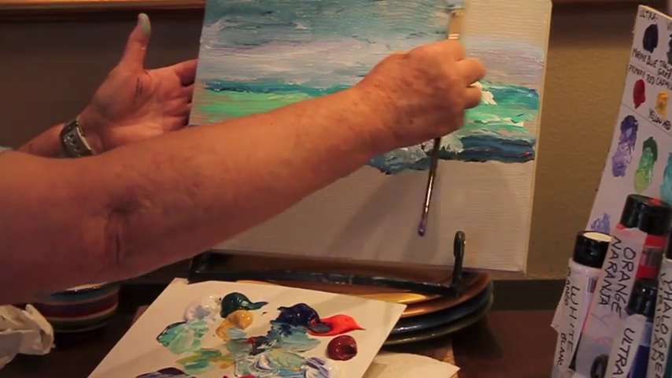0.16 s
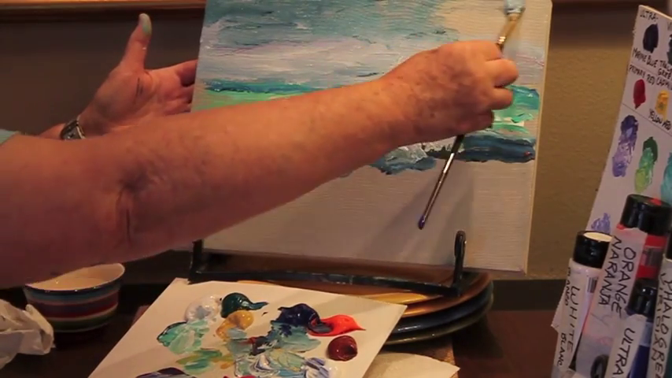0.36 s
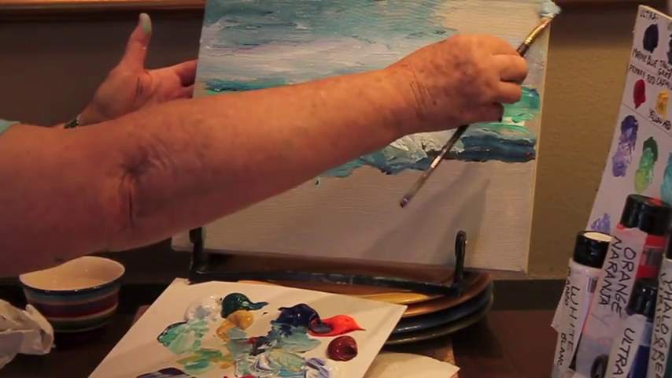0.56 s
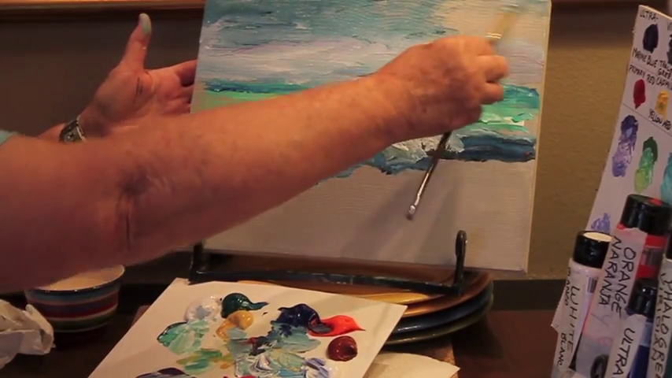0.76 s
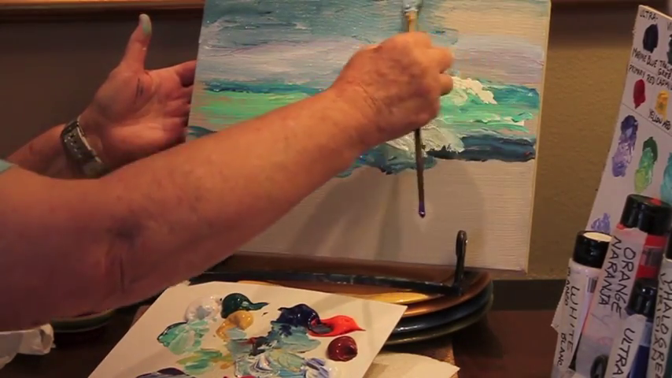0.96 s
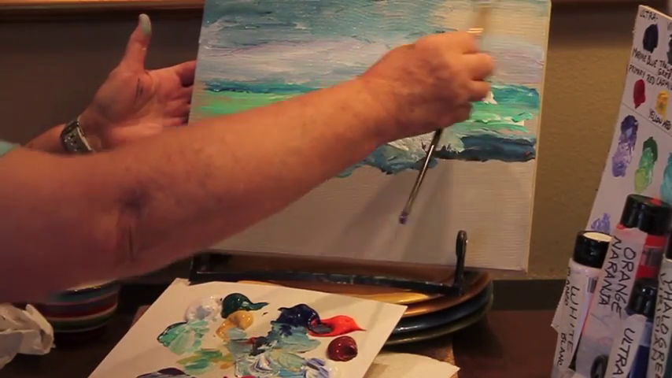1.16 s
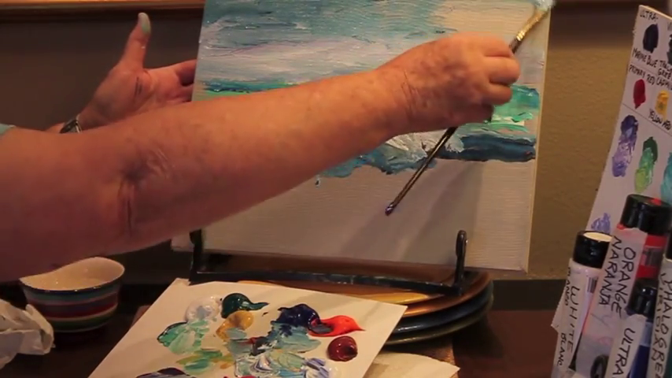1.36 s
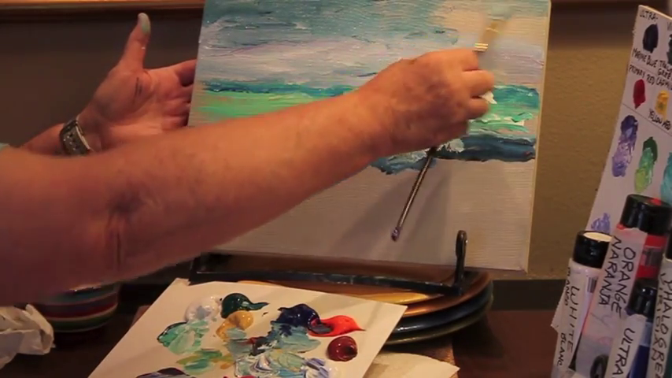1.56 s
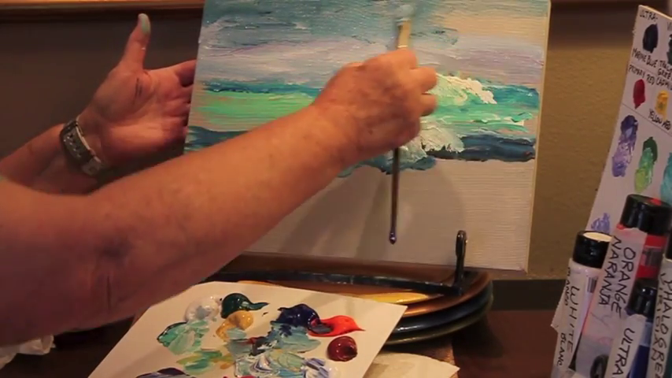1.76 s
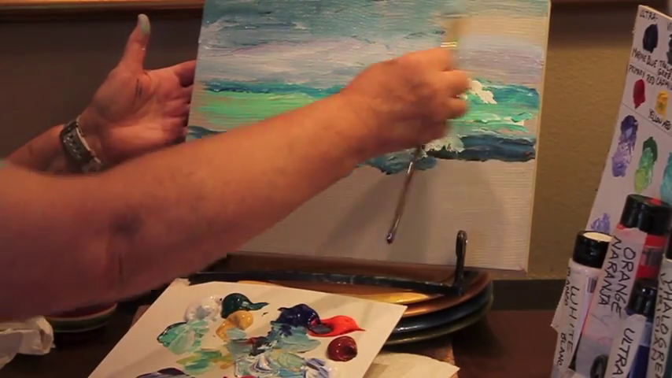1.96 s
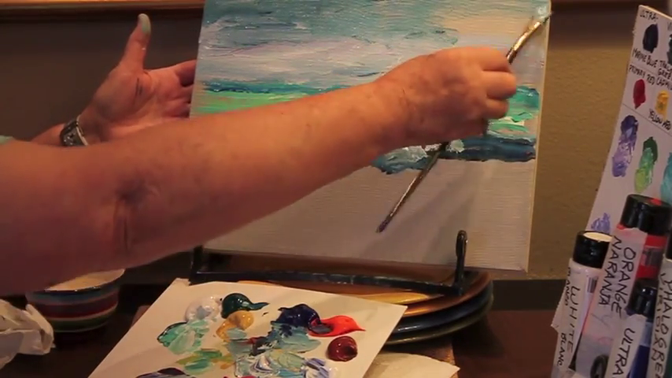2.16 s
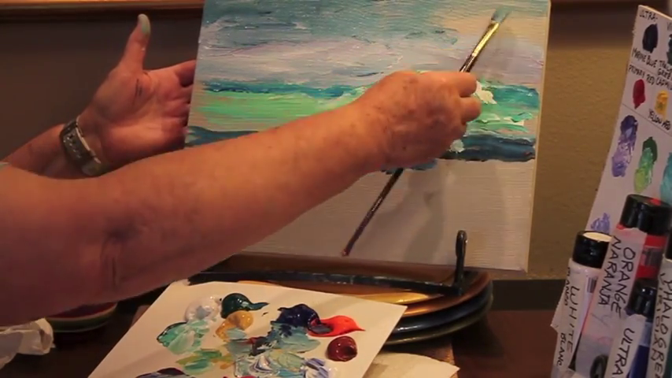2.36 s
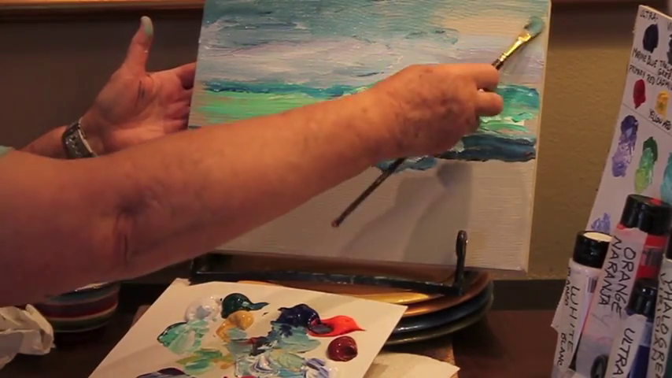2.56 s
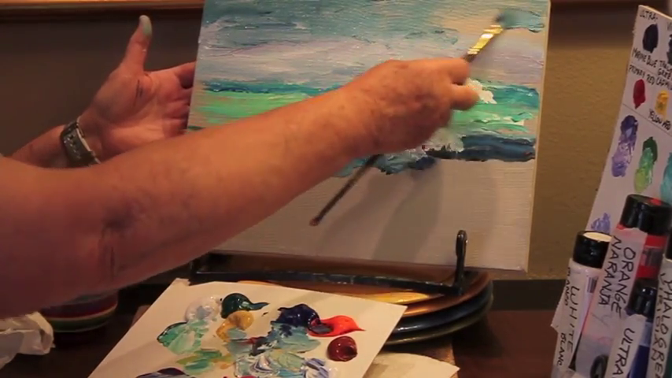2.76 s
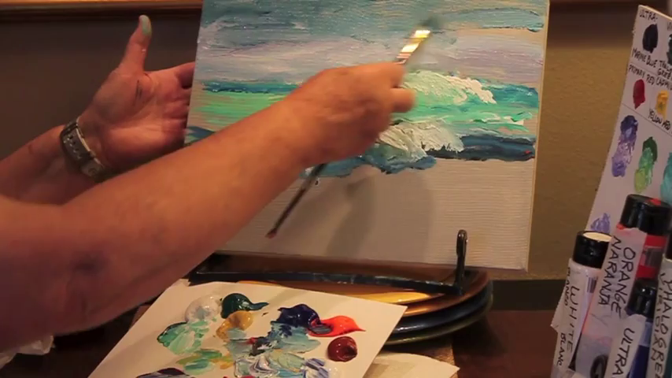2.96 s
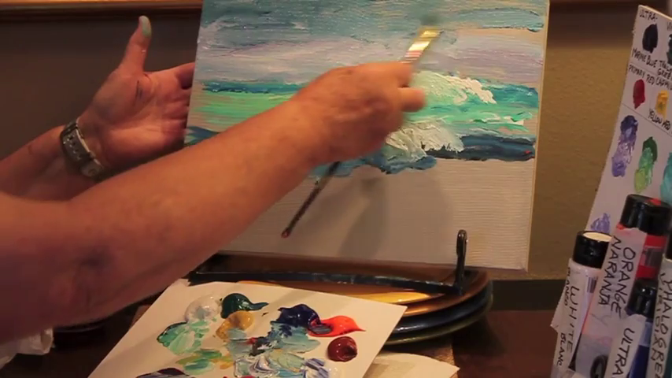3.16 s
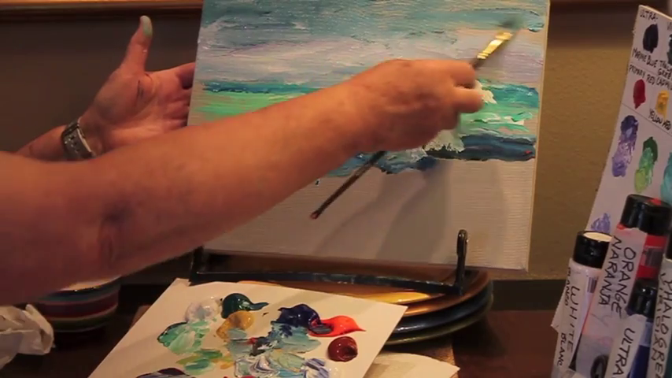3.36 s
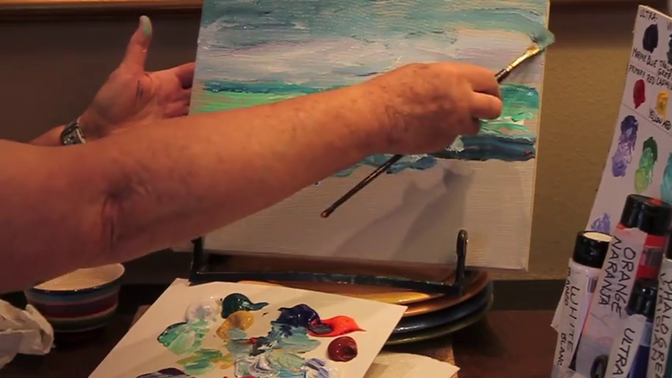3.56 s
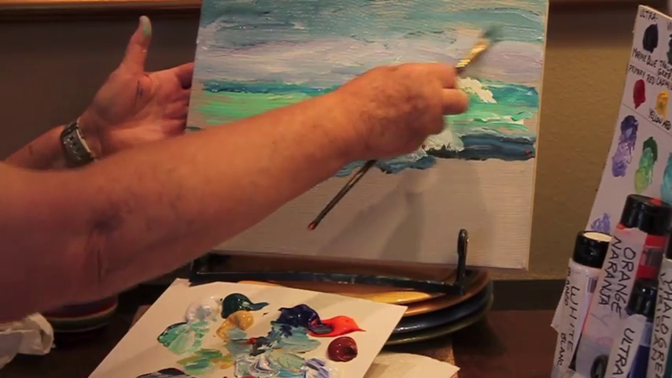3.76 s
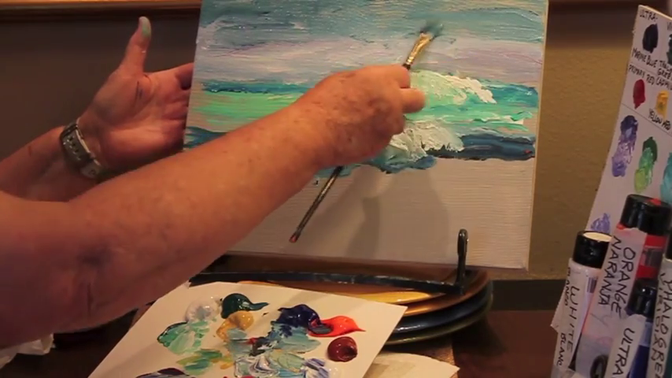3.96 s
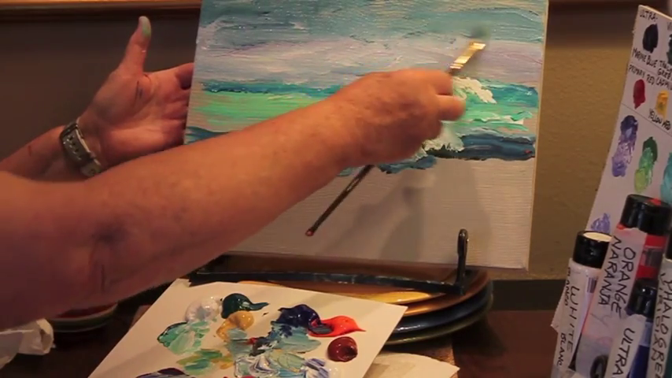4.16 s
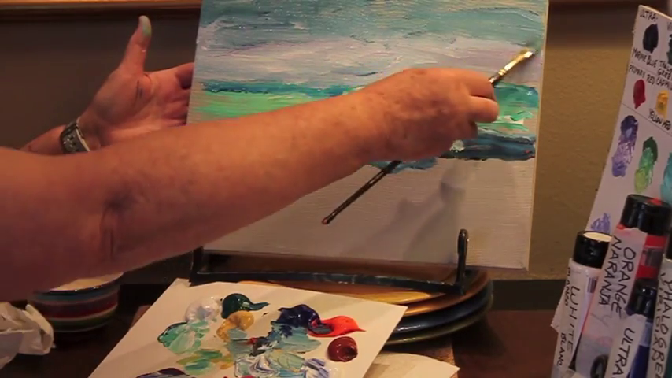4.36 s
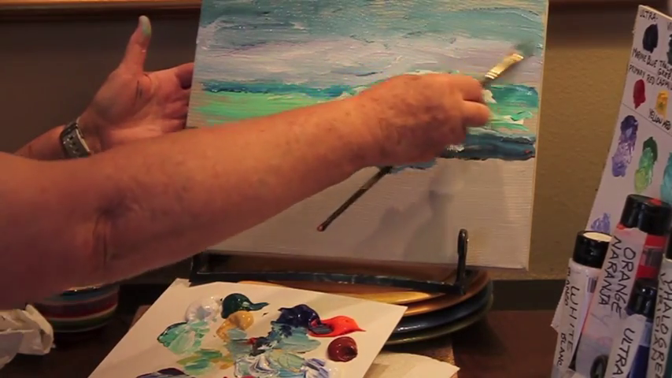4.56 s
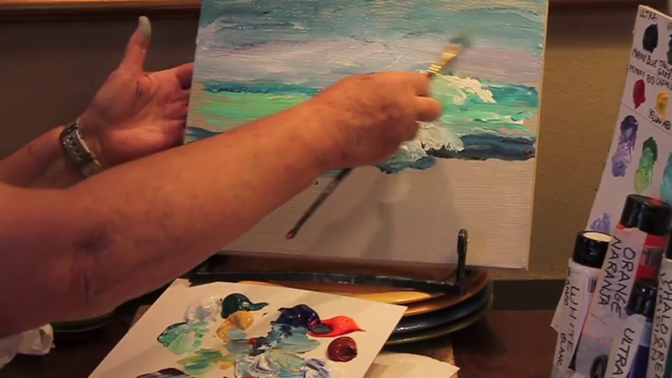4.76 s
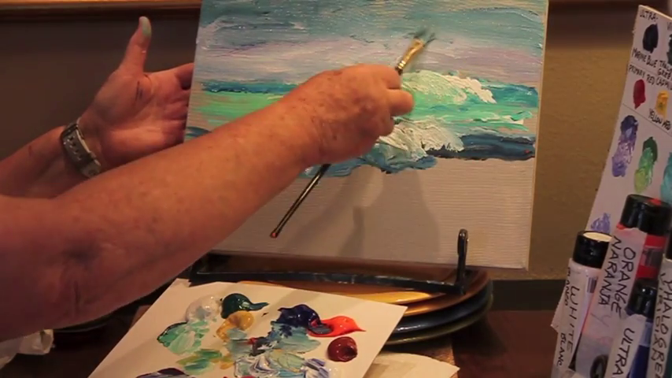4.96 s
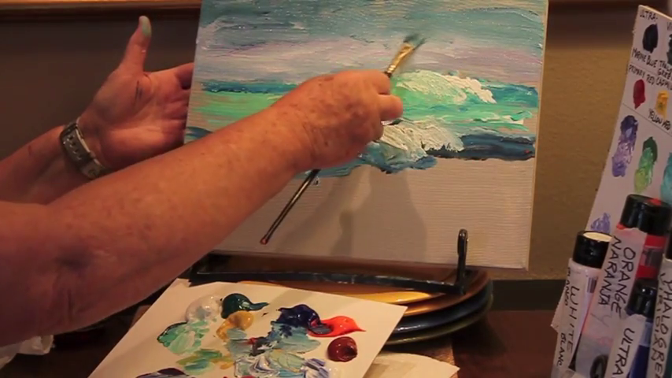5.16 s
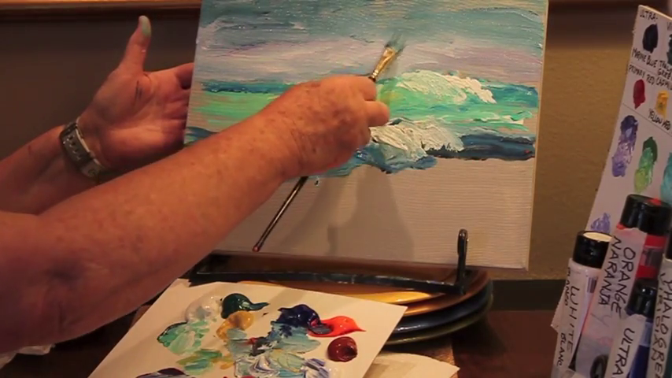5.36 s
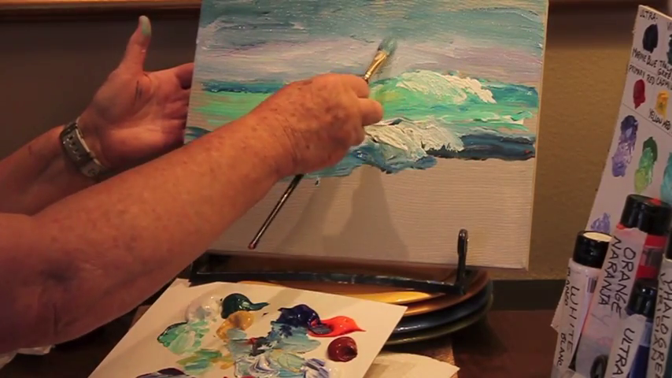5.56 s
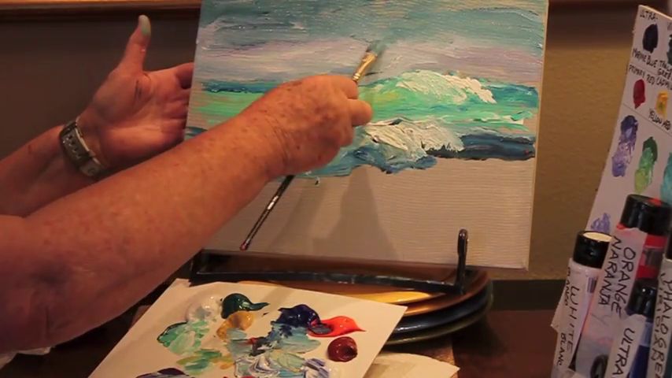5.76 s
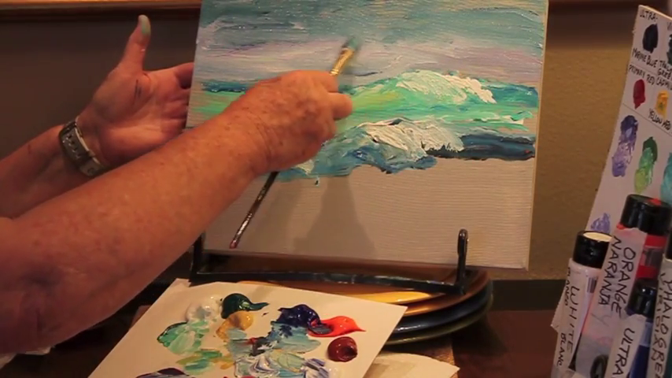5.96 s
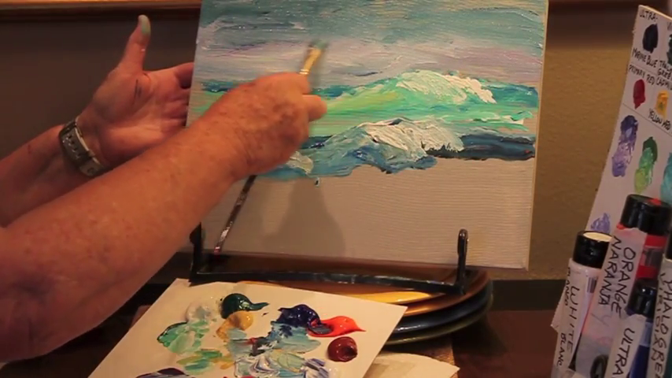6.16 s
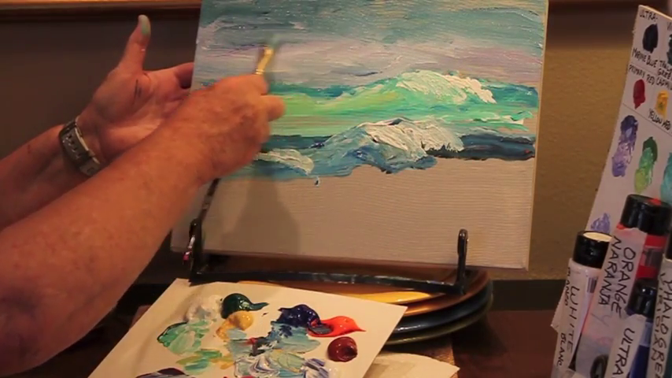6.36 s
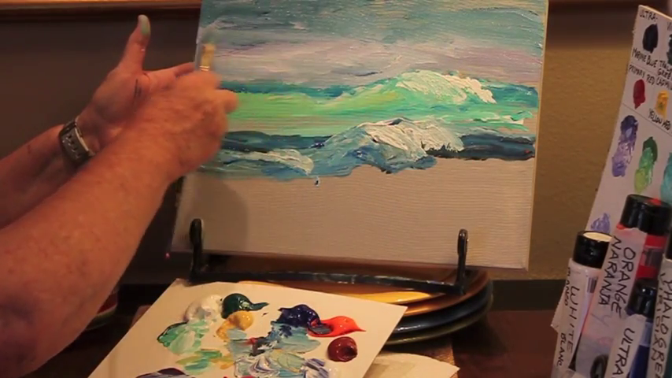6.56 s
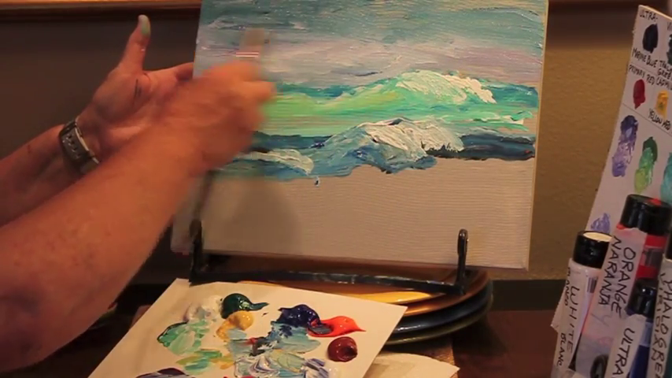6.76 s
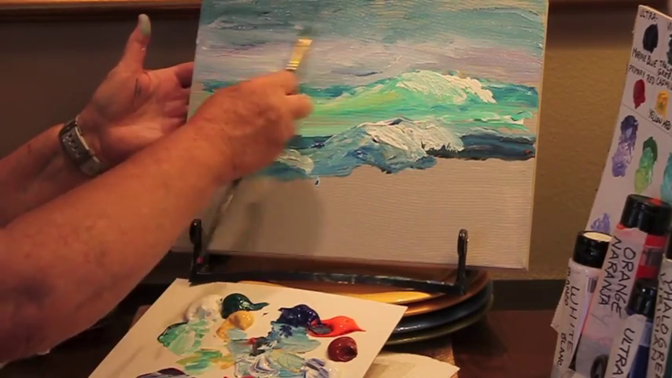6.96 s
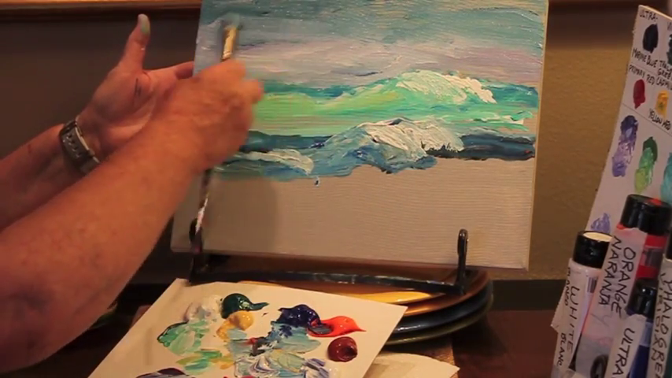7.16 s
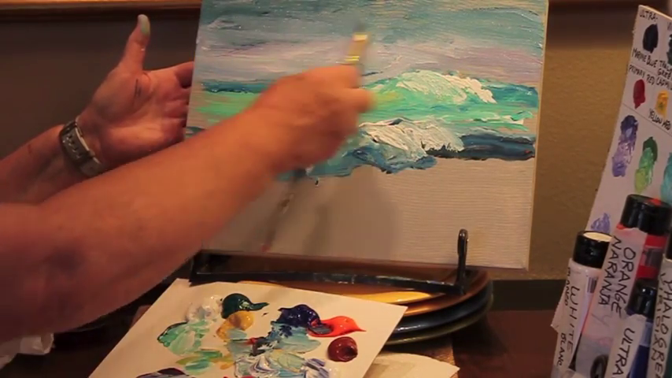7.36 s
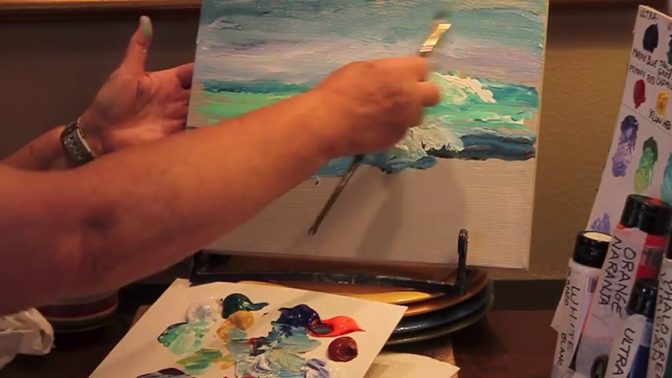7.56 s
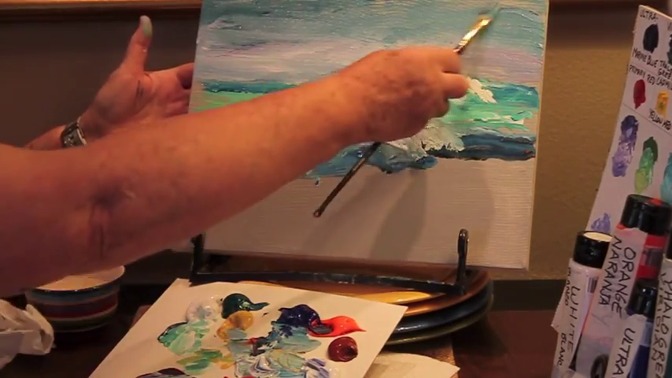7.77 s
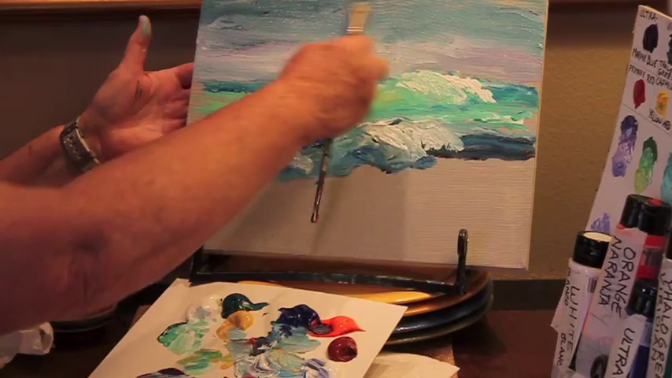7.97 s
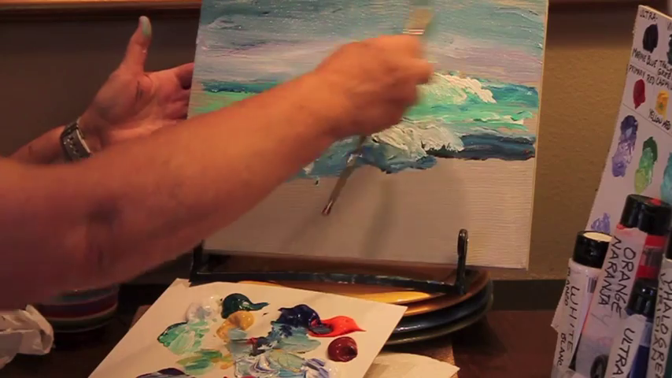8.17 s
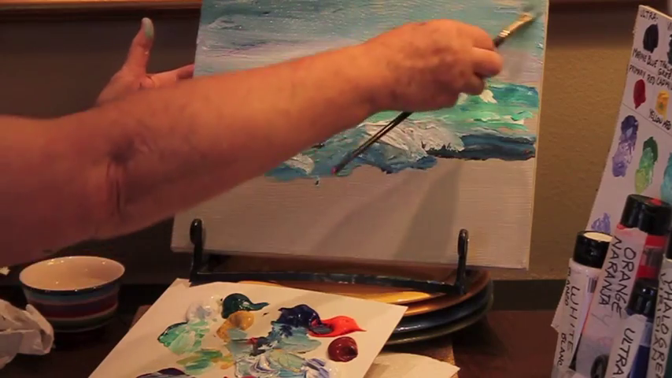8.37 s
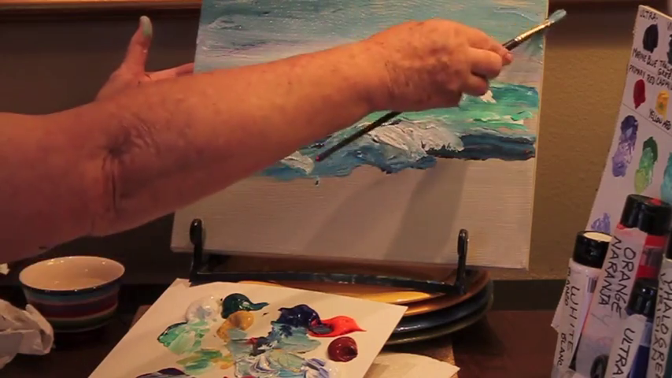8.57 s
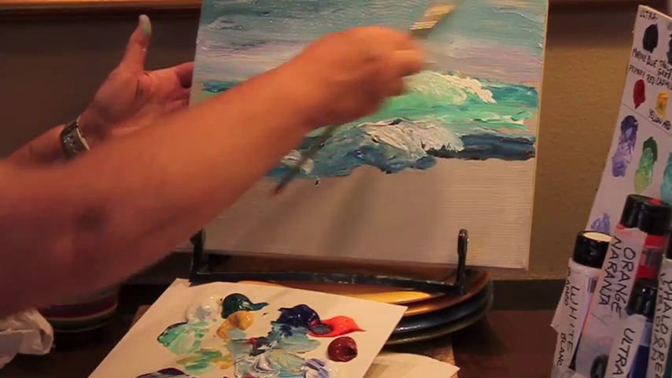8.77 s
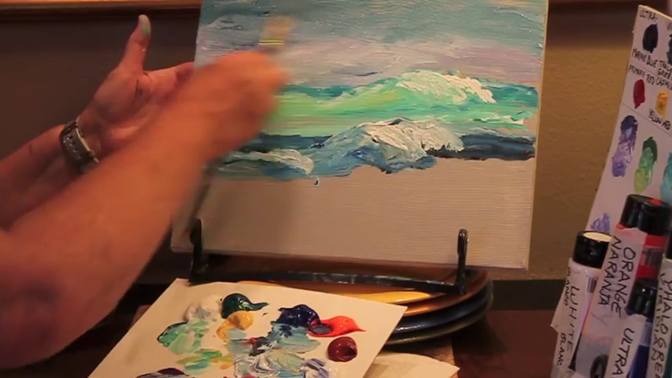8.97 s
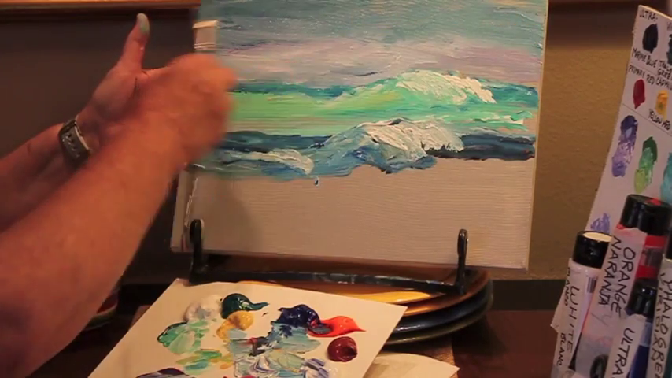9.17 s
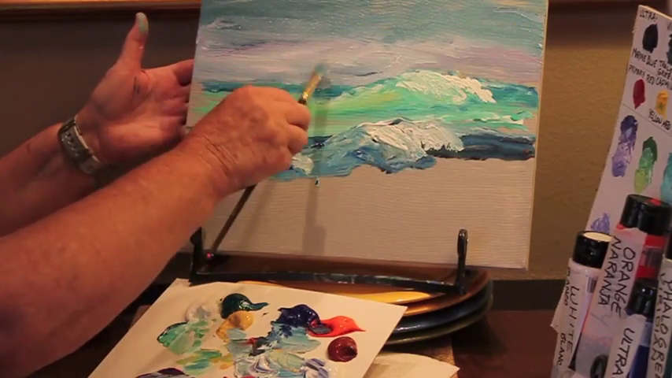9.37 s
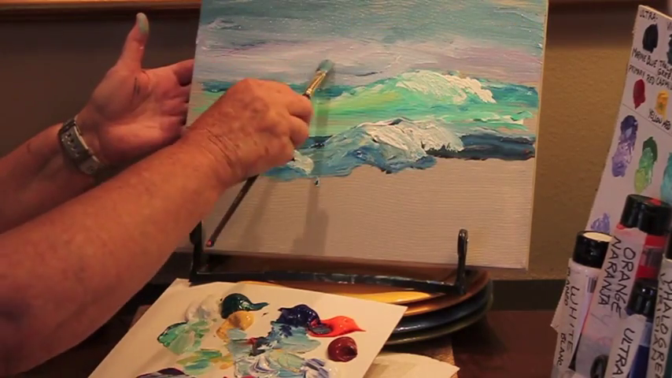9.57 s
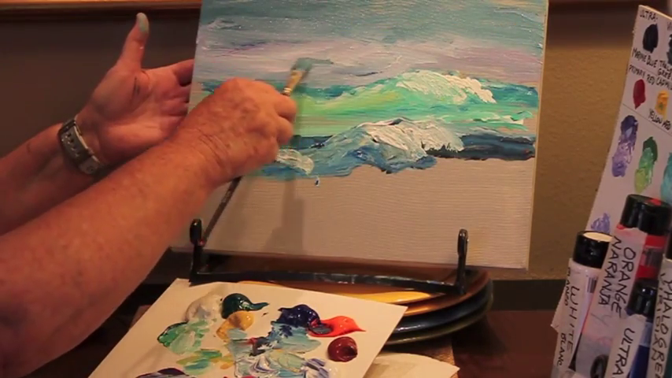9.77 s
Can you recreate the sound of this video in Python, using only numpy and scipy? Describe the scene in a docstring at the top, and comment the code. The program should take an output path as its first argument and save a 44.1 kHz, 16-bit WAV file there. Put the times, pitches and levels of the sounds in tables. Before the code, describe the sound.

A bristle brush scrubs thick paint over a canvas board in quick, dry, hissing strokes. Wet paint gives tiny crackles and snaps, and the board creaks briefly on its easel. The strokes start firm, thin to faint touches past the middle, then grow stronger again near the end. It is heard from nearby in a small room, with a steady, gently pulsing motor hum and soft rushing air.

```python
"""Scrubbing paint onto a canvas

A bristle brush scrubs thick paint back and forth over a canvas board on an easel, in a small room.
Bristles catch and let go on the weave and set the board rasping; wet paint crackles and snaps,
and the board creaks on its stand. Two motors hum and beat against each other over a soft rush of air."""
import sys
import numpy as np
from scipy import signal
from scipy.fft import rfft, irfft, next_fast_len
from scipy.io import wavfile

SR = 44100
rng = np.random.default_rng(int(sys.argv[2]) if len(sys.argv) > 2 else 0)


def generate_wav(signal):
    """Clip the signal to [-1, 1] and save it as 16-bit WAV at the path in sys.argv[1]."""
    frames = np.transpose(np.atleast_2d(signal))
    scaled = np.clip(frames, -1, 1) * 32767
    pcm = np.round(scaled).astype(np.int16)
    wavfile.write(sys.argv[1], SR, pcm)


N = 432621
TIME = np.arange(N) / SR


def from_db(db):
    """Turn decibels into a number to multiply a sound by."""
    return 10 ** (np.asarray(db) / 20)


def unit_level(x):
    """Scale a sound so that its average (rms) level is one."""
    return x / np.sqrt(np.mean(x ** 2) + 1e-20)


def band(x, low_hz, high_hz, order=2):
    """Keep what lies between two frequencies; a higher order cuts more sharply."""
    sections = signal.butter(order, [low_hz, min(high_hz, .45 * SR)], "band", fs=SR, output="sos")
    return signal.sosfilt(sections, x + 1e-18)


def coloured(x, spectrum):
    """Turn frequencies up or down along a curve of (frequency [Hz], level [dB]) points."""
    size = next_fast_len(N)
    hz, db = np.transpose(spectrum)
    bin_hz = np.maximum(np.arange(size // 2 + 1) * SR / size, 1)
    gain = from_db(np.interp(np.log(bin_hz), np.log(hz), db))
    return irfft(rfft(x, size) * gain, size)[:N]


def drift(rate_hz):
    """A smooth random wobble, mostly between -1 and 1."""
    step = 40  # samples between random values
    r = np.exp(-2 * np.pi * step * rate_hz / SR)
    noise = rng.standard_normal(N // step + 2002)
    slow = signal.lfilter([1], [1, -2 * r, r * r], noise)[2000:]  # let the filter settle first
    return np.interp(np.arange(N) / step, np.arange(len(slow)), unit_level(slow))


def resonance(x, hz, width_hz):
    """Let through only the sound close to one pitch."""
    r = np.exp(-np.pi * width_hz / SR)
    poles = [1, -2 * r * np.cos(2 * np.pi * hz / SR), r * r]
    return signal.lfilter(np.array([1, 0, -1]) * (1 - r * r) / 2, poles, x)


def moving_resonance(x, centre_hz, width_hz, block=128):
    """A resonance whose pitch glides in tiny steps."""
    r = np.exp(-np.pi * width_hz / SR)
    out, state = np.zeros(N), np.zeros(2)
    for i in range(0, N, block):
        poles = [1, -2 * r * np.cos(2 * np.pi * centre_hz[i] / SR), r * r]
        out[i:i + block], state = signal.lfilter([1, 0, -1], poles, x[i:i + block], zi=state)
    return unit_level(out)


def ring(x, hz, fade_s):
    """Each click starts a pure tone that falls by 60 dB in fade_s."""
    r = from_db(-60 / (fade_s * SR))
    angle = 2 * np.pi * hz / SR
    return signal.lfilter([0, np.sin(angle)], [1, -2 * r * np.cos(angle), r * r], x + 1e-18)


def clicks(events):
    """One click for each (time [s], level [dB]) row."""
    out = np.zeros(N)
    for time_s, db in events:
        out[min(round(time_s * SR), N - 1)] += from_db(db)
    return out


def smear(x, fade_s):
    """Spread every moment of a sound into a noisy tail that falls by 60 dB in fade_s."""
    t = TIME[:SR // 2]
    tail = rng.standard_normal(len(t)) * from_db(-60 * t / fade_s)
    return signal.fftconvolve(x, tail / np.linalg.norm(tail))[:N]


# tone colour of the moving air: (frequency [Hz], relative level [dB])
AIR_COLOUR = [(20, -21), (42, -23), (52, -9), (70, -4.5), (120, -2), (190, -2), (260, 3.5), (340, -4),
              (440, 2), (600, -5.5), (900, -6), (1700, -15), (3500, -18), (9000, -23.5), (16000, -27.5)]


def air(level_db=-52):
    """Moving air makes a smooth, low rush."""
    return from_db(level_db) * unit_level(coloured(rng.standard_normal(N), AIR_COLOUR))


# tones of the motors and the mains power: (pitch [Hz])
HUM_PITCHES = [58.4, 76.5, 102, 120, 167.1, 175.2, 178.4, 203.9, 233.58, 235.41, 280.4, 287.8, 292, 407.8,
               440.7, 451.4, 467.2, 759.1]
# how strong each of those tones is: (level [dB])
HUM_LEVELS = [-77, -81, -76, -68.5, -72.5, -82, -66, -70, -59.5, -55.5, -72.5, -69.5, -55, -65.5, -67.5,
              -78, -61, -70.5]


def motors(waver_db=1.06):
    """Motors hum in gently wavering tones; the closest pair beats about twice a second."""
    hum = np.zeros(N)
    for hz, db in zip(HUM_PITCHES, HUM_LEVELS):
        tone = np.sqrt(2) * np.sin(2 * np.pi * hz * TIME)
        hum += from_db(db + waver_db * drift(rate_hz=1.57)) * tone
    return hum


def room(x, echo_db=-5.0):
    """Near walls send back a quick, slightly dull blur of echoes."""
    return from_db(echo_db) * band(smear(x, fade_s=0.24), 120, 6000, order=1)


# the notes the easel rings with: (pitch [Hz], relative level [dB], fade time [s])
EASEL_NOTES = [(353, -13, 0.14), (787, -14, .1), (1047, -9.5, 0.26), (1335, -12, 0.084), (1834, -20, 0.23),
               (2174, -9.5, 0.23)]


def easel(jolts):
    """Each jolt sets the easel ringing briefly."""
    return sum(from_db(db) * ring(jolts, hz, fade_s) for hz, db, fade_s in EASEL_NOTES)


# moments when the board slips on the easel: (time [s], level [dB])
BOARD_SLIPS = [(0.0553, -38), (0.244, -40), (0.3623, -42), (2.067, -37.5), (3.4315, -46), (3.878, -46),
               (5.356, -55)]
# the tones in one creak: (multiple of the creak's pitch, relative level [dB])
CREAK_TONES = [(1, -7.5), (2, -1.5), (3, -6.5), (4, -31)]


def creaks(start_hz=465, end_hz=560, length_s=0.032, flutter_db=3.0):
    """The board jolts the easel, then sticks and slips faster and faster until it settles."""
    out = easel(clicks(BOARD_SLIPS))
    pitch_wobble = 1 + 0.018 * drift(rate_hz=130)
    grip = from_db(flutter_db * drift(rate_hz=340))
    for time_s, db in BOARD_SLIPS:
        span = slice(round(time_s * SR), round((time_s + length_s) * SR))
        progress = np.sqrt(np.clip((TIME[span] - time_s) / length_s, 0, 1))  # 0 to 1, quick at first
        pitch_hz = (start_hz + (end_hz - start_hz) * progress) * pitch_wobble[span]
        phase = 2 * np.pi * np.cumsum(pitch_hz) / SR
        creak = sum(from_db(tone_db) * np.sin(multiple * phase) for multiple, tone_db in CREAK_TONES)
        out[span] += from_db(db) * np.sin(np.pi * progress) * grip[span] * creak
    return out


# sticky snaps of paint and bristle tips: (time [s], relative level [dB])
PAINT_SNAPS = [(0.0283, -26), (0.051, -18), (0.1084, -13), (0.1365, -13), (0.1514, -28), (0.185, -12),
               (0.2022, -8.5), (1.1854, -11), (1.2214, -33), (1.5045, -29), (2.0337, -6), (4.2083, -28),
               (6.1789, -33), (6.3904, -37), (6.5271, -39), (6.9955, -21.5), (8.114, -24), (9.7737, -35)]


def snaps(boost_db=1.5, spray_db=1.5):
    """Sticky paint snaps with a sharp tick, then a very short spray of bristles."""
    ticks = clicks(PAINT_SNAPS)
    spray = from_db(spray_db) * smear(ticks, fade_s=0.02)
    return from_db(boost_db) * band(ticks + spray, 7500, 15000)


def flicks(per_s, spread_db):
    """Tiny clicks of things letting go at random moments, most softly and a few hard."""
    sizes = from_db(spread_db * np.minimum(rng.exponential(1, N), 5))
    signs = rng.choice([-1, 1], N)
    happens = rng.random(N) < per_s / SR
    return unit_level(sizes * signs * happens)


def canvas(x, ring_db=-10.0, patch_count=9):
    """Each patch of canvas rings in its own way; the brush travels from one to the next."""
    nearness = np.array([drift(rate_hz=2.74) for _ in range(patch_count)])
    patches = np.array([smear(x, fade_s=0.041) for _ in range(patch_count)])
    ringing = np.sum(nearness * patches, axis=0) / np.linalg.norm(nearness, axis=0)
    return x + from_db(ring_db) * ringing


# the notes the board rings with: (pitch [Hz], width [Hz], relative level [dB])
BOARD_NOTES = [(1775, 11, 4), (2210, 85, -7), (2510, 57, 2.5), (2650, 63, -2.5), (2900, 18, 1.5),
               (2955, 52, -3), (3203, 48, 2.5), (3484, 57, 1), (4050, 34, -6), (4385, 84, -9),
               (4500, 29, 2), (5830, 50, -1), (7370, 150, 8)]


def board(slips):
    """Slipping bristles shake the board, which adds its own ringing."""
    return slips + sum(from_db(db) * resonance(slips, hz, width_hz) for hz, width_hz, db in BOARD_NOTES)


# each push or pull of the brush; hiss, drag and tuft are set against the rasp, before brush() mixes them:
# (time [s], rise time [s], time until lift [s], rasp level [dB], swell until lift [dB],
#  hiss level [dB], low drag level [dB], hollow tuft level [dB], tuft starting pitch [Hz])
BRUSH_STROKES = [ (0.0, 0.067, 0.057, -35.5, -0.5, 1.5, -9.5, -25, 2700),
                 (0.075, 0.039, 0.077, -36.5, -0.5, 1, -12.5, -13, 3200),
                 (0.19, .025, 0.052, -38, 0, 5, -16, -27, 3200),
                 (0.285, 0.063, 0.099, -41.5, -2.5, 4, -8.5, -20, 3200),
                 (0.41, 0.062, 0.078, -42, 2.5, 1.5, -13, 6.5, 2700),
                 (0.55, 0.036, 0.046, -51, -2.5, -4, -5, 2, 2900),
                 (0.62, .03, .05, -62, -1, -4, -4, 2, 2900),
                 (0.72, 0.061, 0.11, -34.5, -0.5, -0.5, -12, -3, 2700),
                 (0.825, 0.055, 0.13, -37.5, 2.5, -5, -13.5, -4, 3000),
                 (1.048, 0.064, 0.17, -39.5, -1, 1.5, -11, -7.5, 3070),
                 (1.22, .035, 0.24, -51, -9.5, 1.5, -6, -1, 3000),
                 (1.488, 0.025, 0.19, -38.5, 3.5, -2, -10, 5, 2680),
                 (1.69, 0.037, 0.11, -41, -2, -2.5, -8, -5, 3020),
                 (1.894, .065, 0.18, -36, 0.5, -1, -10, 1, 2860),
                 (2.09, 0.023, 0.044, -46.5, 1.5, -3.5, -2.5, 5, 2820),
                 (2.745, .16, 0.21, -46.5, -1, -2, -3, 5, 3150),
                 (2.96, .05, 0.071, -45.5, -2, 1.5, -3, -3, 3050),
                 (3.122, 0.089, 0.13, -47.5, -0.5, 4, -5, -2, 3050),
                 (3.265, 0.034, 0.21, -47.5, -9.5, -2.5, -4, 2, 3120),
                 (3.5, .04, .06, -63.5, 0, 1, -11, -10, 3000),
                 (3.645, 0.087, 0.15, -43, -0.5, -2, -6.5, -8, 2900),
                 (3.805, 0.061, .115, -43, -1, 0.5, -3, -4, 2900),
                 (4.035, 0.043, 0.2, -53.5, 6, 3.5, -3, 0, 3500),
                 (4.255, 0.047, 0.098, -54.5, 0.5, -1, -5.5, 0, 3300),
                 (4.415, .03, .045, -65, 2, 1, -9, 4, 3900),
                 (4.552, 0.06, 0.054, -46, 1.5, 0, -4.5, -6, 3200),
                 (4.645, 0.05, 0.22, -53, 0, 0, 0.5, -4, 3160),
                 (4.935, .03, 0.036, -61.5, -2, 5, -4, -10, 3000),
                 (5.015, 0.029, 0.036, -63.5, -8, 7.5, 2, -10, 3000),
                 (5.1, 0.028, .06, -64, -2, 3, -2, -10, 3000),
                 (5.205, .05, 0.097, -61, -5, 4.5, -1, -10, 3000),
                 (6.1, .1, 0.21, -69.5, -3, 9, -2, -8, 3000), (6.335, .05, 0.21, -75, 4, 13, 2, -10, 3000),
                 (6.515, .06, 0.092, -57, -1, 4.5, -3, -1.5, 3000),
                 (6.885, .02, .03, -78, 0, 8, -4, -10, 2800),
                 (6.955, 0.066, 0.11, -53, 0, 2.5, -4, -12, 2800),
                 (7.125, .03, 0.035, -68, -5, 6, -3, -8, 2800),
                 (7.305, 0.046, .2, -54.5, 7.5, 0, -7, 4, 2600),
                 (7.495, .06, .15, -51, 8, -4.5, -6, 4, 3070),
                 (7.65, .03, 0.068, -49, -2.5, -4.5, -6, -6, 3100),
                 (7.808, 0.097, 0.14, -40.5, 3.5, -1, -10.5, 1, 2920),
                 (7.96, .02, 0.048, -42.5, -2, 1.5, -7.5, 1, 2880),
                 (8.098, 0.039, .18, -47, 3.5, 1, -7.5, 1, 2870),
                 (8.3, 0.079, .14, -52, 0.5, 0, -9, 1, 2830),
                 (8.604, 0.043, 0.05, -50.5, -2, -2, -9, 0, 3200),
                 (8.77, .04, 0.14, -58, 3.5, 3, -9, 5, 3000),
                 (8.882, 0.057, 0.075, -39.5, -2, -3.5, -15, 8, 2630),
                 (8.958, .04, 0.12, -41.5, -7, -2, -4, 1, 3120),
                 (9.715, .06, .09, -65.5, -5, 6, 2, -10, 3000)]


def strokes(hiss_sag_db_per_s=4, tuft_rise_hz_per_s=1100, tuft_fade_db_per_s=21):
    """Strokes rise, hold and die away: gives rasp, hiss and drag strength, and tuft pitch and level."""
    power, tuft_db = np.zeros((3, N)), np.zeros(N)
    tuft_hz = np.full(N, float(BRUSH_STROKES[0][-1]))
    # rasp, hiss, drag: once the brush lifts, the hiss dies first and the drag last
    release_db_per_s = np.array([[208], [277], [180]])
    for time_s, rise_s, lift_s, level_db, swell_db, hiss_db, drag_db, hollow_db, start_hz in BRUSH_STROKES:
        span = slice(max(round((time_s - rise_s) * SR), 0), round((time_s + lift_s + .5) * SR))
        t = TIME[span] - time_s
        hold_s = max(lift_s - rise_s, .005)
        held_s = np.clip(t - rise_s, 0, hold_s)
        lifted_s = np.maximum(t - lift_s, 0)
        fade_in = 1 / (1 + np.exp(-4.9 * (t / rise_s - .5)))  # an S-shaped rise
        rasp_db = level_db + swell_db * held_s / hold_s
        sag_db = hiss_sag_db_per_s * held_s  # the tips lie down as the stroke goes on
        layers_db = np.array([rasp_db, rasp_db + hiss_db - sag_db, rasp_db + drag_db])
        power[:, span] += (fade_in * from_db(layers_db - release_db_per_s * lifted_s)) ** 2
        # the tuft of bristles rings higher and more faintly as it bends
        tuft_hz[span] += fade_in * (start_hz + tuft_rise_hz_per_s * held_s - tuft_hz[span])
        tuft_db[span] += fade_in * (hollow_db - tuft_fade_db_per_s * held_s - tuft_db[span])
    return (*np.sqrt(power), tuft_hz, tuft_db)


# tone colour of bristles rubbing on the weave: (frequency [Hz], relative level [dB])
RUB_COLOUR = [(600, -3), (950, -7.5), (1300, -5), (1800, -4), (2300, -4.5), (3000, -1.5), (3800, -1.5),
              (5000, -2.5), (7000, -4), (9000, -2.5), (12000, -2), (14500, -2), (16000, -5)]


def brush(grab_db=0.95):
    """Thousands of bristle slips make the board rasp; the tips hiss, and wet paint crackles as it parts."""
    rasp_gain, hiss_gain, drag_gain, tuft_hz, tuft_db = strokes()
    slips = coloured(canvas(flicks(per_s=14000, spread_db=2.5)), RUB_COLOUR)
    shaking = board(slips)
    scrape = unit_level(band(shaking, 2560, 6130, order=4))
    drag = unit_level(band(shaking, 670, 2250, order=4))
    sizzle = unit_level(band(slips, 6520, 10460, order=4))
    hiss = unit_level(band(slips, 10860, 14700, order=4))
    # the tuft takes its share of the rasp and makes it hollow
    tuft_slips = canvas(flicks(per_s=6000, spread_db=5.0))
    tuft = unit_level(band(moving_resonance(tuft_slips, tuft_hz, width_hz=600), 1430, 4800))
    share = from_db(tuft_db - 2.5)
    rasp = (scrape + share * tuft) / np.hypot(1, share)
    crackle = unit_level(band(flicks(per_s=400, spread_db=4.5), 7000, 20000))
    sound = from_db(-1.5) * (rasp_gain * rasp + drag_gain * drag + hiss_gain * hiss)
    sound += from_db(-6.5) * hiss_gain * crackle
    # a light touch leaves only the finest hiss; pressing fills in the sizzle below it
    sound += from_db(-6.0) * np.sqrt(rasp_gain * hiss_gain) * sizzle
    # tufts of bristles grab and give way together
    return sound * from_db(grab_db * drift(rate_hz=19))


def scene():
    """The painter's sounds in the humming room, as one channel."""
    painting = brush() + creaks() + snaps()
    return (painting + room(painting) + motors() + air())[None]


def record(dry, cutoff_hz=16050):
    """Cut away the very highest treble."""
    low_pass = signal.firwin(601, cutoff_hz, fs=SR, window="blackman")
    return signal.fftconvolve(dry, low_pass[None], mode="same")


dry = scene()
out = record(dry)
generate_wav(out)
```